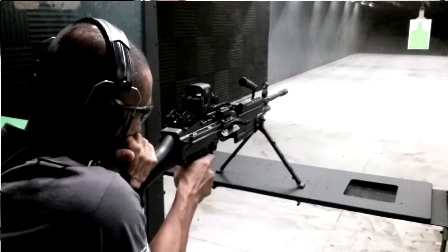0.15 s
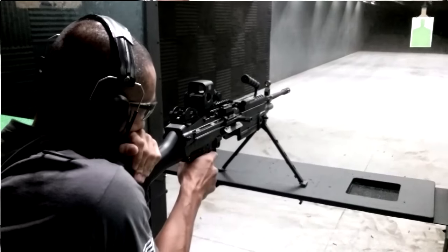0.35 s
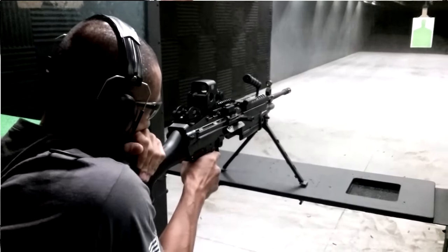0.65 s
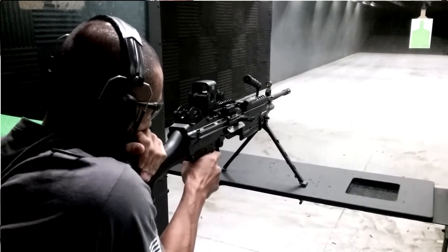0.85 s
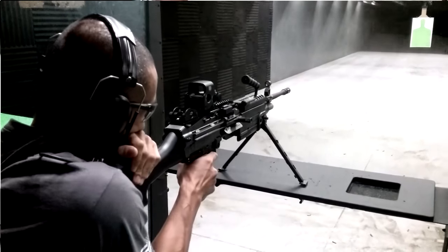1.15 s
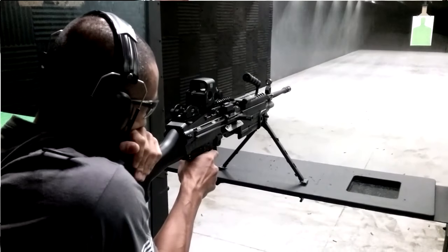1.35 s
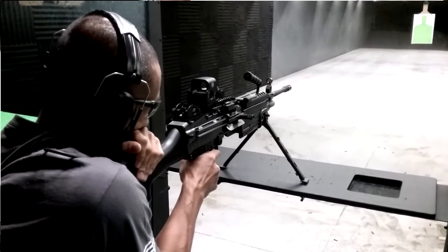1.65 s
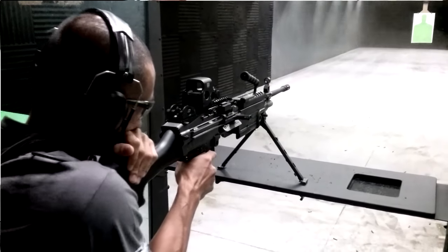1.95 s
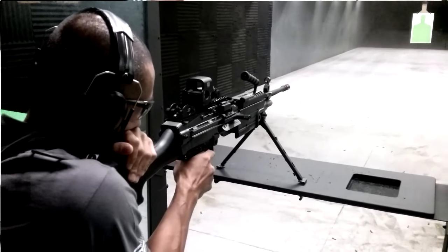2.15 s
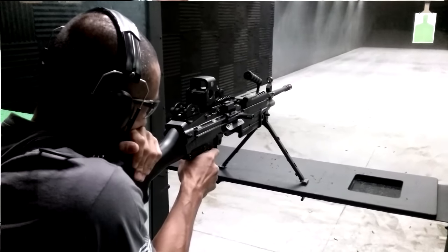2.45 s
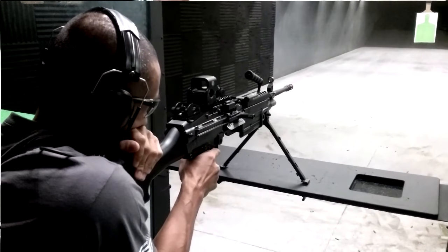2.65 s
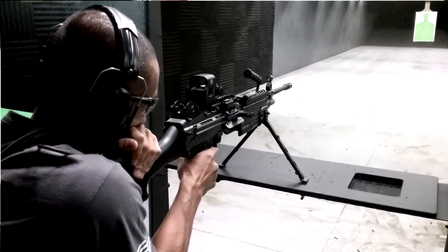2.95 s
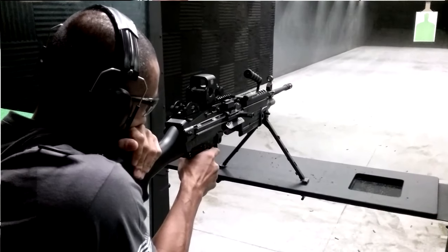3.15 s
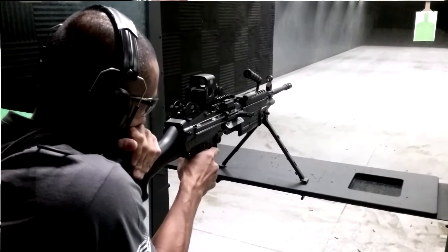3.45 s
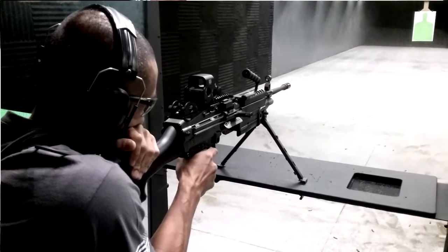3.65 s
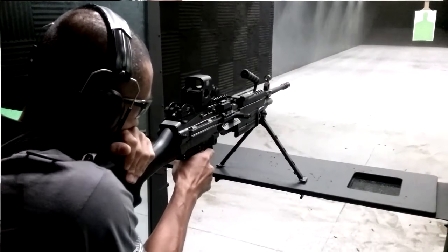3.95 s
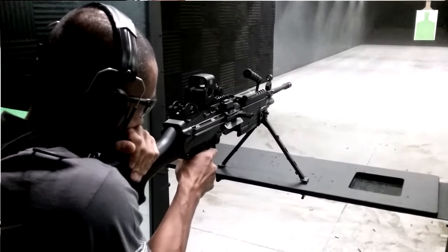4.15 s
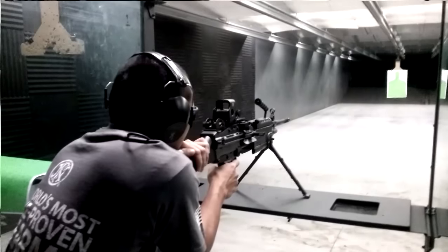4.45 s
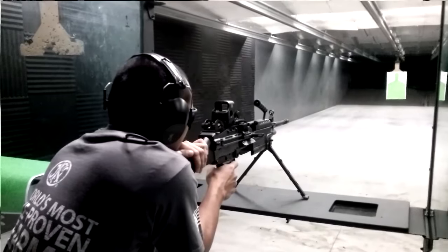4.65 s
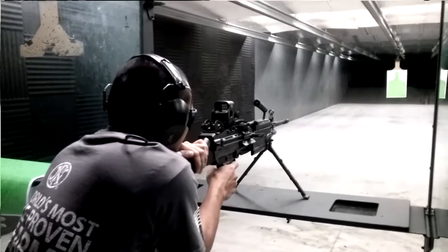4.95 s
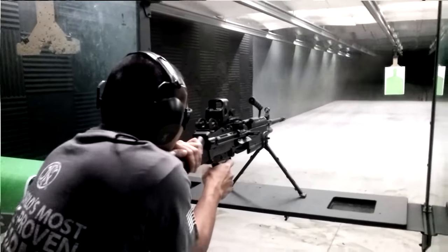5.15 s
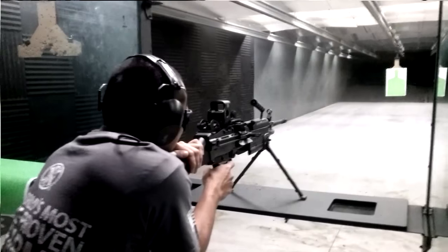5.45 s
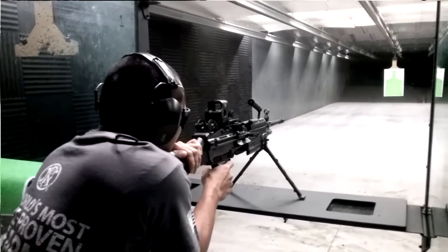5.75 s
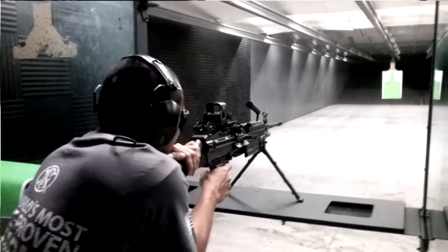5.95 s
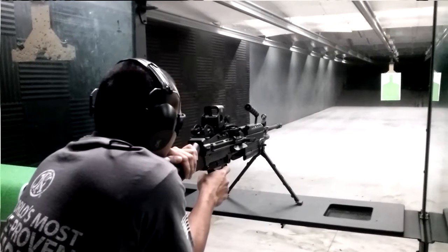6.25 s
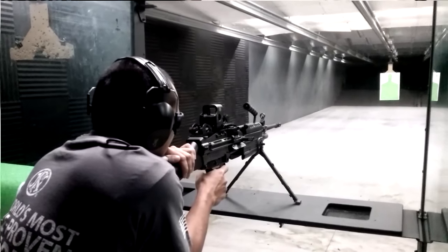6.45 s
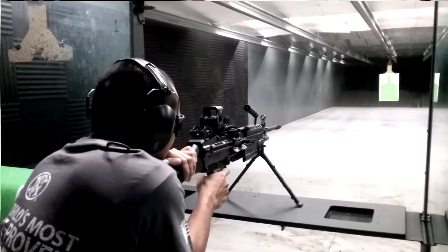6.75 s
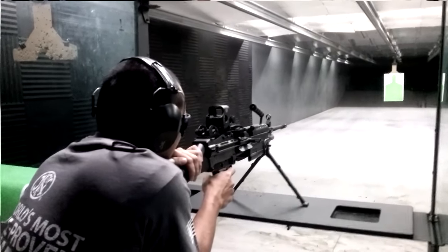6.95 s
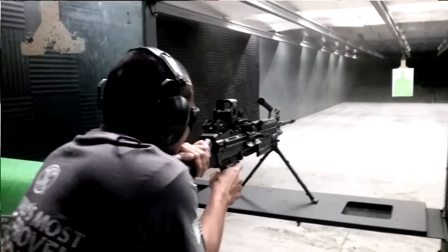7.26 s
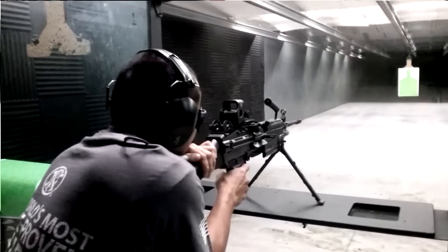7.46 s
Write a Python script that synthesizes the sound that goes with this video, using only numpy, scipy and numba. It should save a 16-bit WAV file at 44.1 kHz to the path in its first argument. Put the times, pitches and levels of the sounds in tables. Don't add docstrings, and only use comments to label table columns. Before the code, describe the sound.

Close hand-held stereo capture of a bipod-mounted machine gun fired shot by shot in a hard, echoing hall. Each steel bolt clack and sharp crack becomes a distorted boom with a dense decaying roar. Cases tick and ring between shots. Midway the view changes abruptly, background hum surges, then two further blasts duck it again.

```python
import sys
import numpy as np
from scipy import signal
from scipy.fft import rfft, irfft
from scipy.io import wavfile
from scipy.ndimage import uniform_filter1d
from numba import njit

SR = 44100
rng = np.random.default_rng(int(sys.argv[2]) if len(sys.argv) > 2 else 0)


def persist_wave(psi):
    counts = np.round(np.clip(psi, -1, 1) * 32767).astype(np.int16)
    wavfile.write(sys.argv[1], SR, np.atleast_2d(counts).T)


def amplitude_ratio(level_db):
    exponent = np.asarray(level_db, float) / 20
    return 10 ** exponent


N = 335601
T = np.arange(N) / SR
HZ = np.fft.rfftfreq(N, 1 / SR)
CUT_S, AFTER_S = 4.1955, 4.2005
LEFT_RIGHT = np.array([[1], [-1]])

# t/s, blast over the overload point/dB, stretch of the hall's decay [ratio],
# lead of the crack/s, crack level/dB
SHOTS = [
    (0.0569, 35, 0.75, 0.007, -9.5),
    (1.072, 35.5, 0.73, 0.0077, 0.5),
    (1.999, 33.5, 0.79, 0.0037, -15),
    (3.851, 32.5, 0.9, 0.0084, -0.5),
    (5.1858, 38, 0.65, 0.0072, -3),
    (7.165, 37.5, 0.66, 0.0088, -1.5),
]
# f/Hz, roar at the blast/dB per Hz, time to fall 60 dB/s,
# left minus right/dB, left-right likeness [-1 to 1]
HALL = [(40, -42, 1.8, -5, 0.9), (71, -19, 3.17, -0.5, 1), (154, -8.5, 1.64, -2.5, 0.99),
        (300, -8, 1.72, -2, 1), (840, -2.5, 1.637, -1.5, 0.38), (1400, 0.5, 1.43, -3.5, -0.15),
        (2000, -3.5, 1.44, -0.5, -0.19), (2556, -1.5, 1.486, -4, 0.057), (4150, -2, 1.447, -1.5, 0.032),
        (6310, -10, 1.06, -3.5, 0.038), (9000, -22, 0.43, -2.5, 0.29), (15140, -59, 0.69, -12.5, 0.13)]


def band(x, hz, width):
    edges = [hz - width / 2, hz + width / 2]
    return signal.sosfilt(signal.butter(2, edges, "band", fs=SR, output="sos"), x)


def unit(x):
    return x / np.sqrt(np.mean(x ** 2))


def at(hz, table, col):
    table = np.array(table)
    return np.interp(np.log(np.maximum(hz, 1)), np.log(table[:, 0]), table[:, col])


def fade(start, t60, rise):
    age = np.maximum(T - start, 0)
    alive = (T < CUT_S) == (start < CUT_S)
    return alive * (1 - np.exp(-age / rise)) * amplitude_ratio(-60 * age / t60)


def wander(seconds):
    size = int(seconds * SR)
    once = uniform_filter1d(rng.standard_normal(N), size)
    return unit(uniform_filter1d(once, size))


def diffuse(hz):
    wall_s, wall_share = .00995, 0.7
    wall_low_hz, wall_top_hz = 210, 900
    shape = np.exp(-(np.log((HZ + 1) / hz) / 0.2) ** 2)
    bounce = wall_share * np.exp(-2j * np.pi * HZ * wall_s)
    bounce = bounce / (1 + (HZ / wall_top_hz) ** 4) / (1 + (wall_low_hz / (HZ + 1)) ** 4)
    mid, side = irfft(unit(shape) * (1 + bounce) * rfft(rng.standard_normal((2, N))), N)
    like = np.clip(at(hz, HALL, 4), -1, 1)
    pair = np.sqrt(1 + like) * mid + np.sqrt(1 - like) * side * LEFT_RIGHT
    return pair * np.sqrt(hz) * amplitude_ratio(at(hz, HALL, 3) * LEFT_RIGHT / 2)


def hall():
    # f/Hz, level/dB per Hz
    fan_hum = [(30, -5), (60, 11.5), (150, 5), (230, -2.5), (400, -4), (900, -5.5), (1700, -4),
               (2400, -4.5), (3200, -5), (4500, -7.5), (6000, -22.5), (9000, -38), (16000, -48.5)]
    # f/Hz, level under the first roar/dB
    far_end = [(100, -36.5), (300, -33), (600, -30.5), (900, -22), (1400, -27), (1850, -34.5),
               (2500, -27.5), (3300, -39), (5000, -47.5), (7000, -59.5), (9000, -69)]
    fans_db, fans_patchy_share = -40.5, 0.27
    late_t60_s = 2.31
    patchy_size_db, patchy_s = 1.36, 0.034
    roar, fans = 0, 0
    late = sum(amplitude_ratio(db) * fade(s, late_t60_s, rise=.05) for s, db, *_ in SHOTS)
    for hz in 32 * 2 ** np.arange(0, 9.1, 1 / 3):
        t60 = at(hz, HALL, 2)
        swell = sum(amplitude_ratio(db) * fade(s, t60 * stretch, rise=0.011 + 8 / hz) for s, db, stretch, *_ in SHOTS)
        echoes = swell + late * amplitude_ratio(at(hz, far_end, 1))
        air = diffuse(hz)
        patchy_db = patchy_size_db * wander(patchy_s)
        roar = roar + amplitude_ratio(at(hz, HALL, 1) - 52.5) * echoes * air * amplitude_ratio(patchy_db)
        fans = fans + amplitude_ratio(at(hz, fan_hum, 1) + fans_patchy_share * patchy_db) * air[:, ::-1]
    return roar + amplitude_ratio(fans_db) * unit(fans)


def bolt():
    # t/s, level/dB
    runs = [
        (0.03, -16),
        (1.043, -18),
        (1.972, -18),
        (3.822, -19.5),
        (5.157, -20),
        (7.135, -18),
    ]
    spikes = amplitude_ratio(np.minimum(2 * rng.standard_exponential((2, N)), 9))
    grit = rng.standard_normal((2, N)) * spikes
    steel = unit(band(grit, 3300, 3500)) + amplitude_ratio(-11.5) * unit(band(grit, 8800, 11000))
    loudness = 0
    for s, db in runs:
        stop = np.clip((s + 0.023 - T) / 0.0069, .3, 1)
        loudness = loudness + amplitude_ratio(db) * fade(s, 0.14, rise=0.0083) * stop
    return steel * loudness


def blast():
    snap = unit(band(rng.standard_normal((2, N)), 3270, 4200))
    return snap * sum(amplitude_ratio(db - 8.0) * fade(s - lead, 0.073, rise=0.0018) for s, _, _, lead, db in SHOTS)


def bay():
    # f/Hz, level/dB, time to fall 60 dB/s
    modes = [(95, -36, 2.27), (292, -59, 3), (411, -59.5, 1.5), (574, -58.5, 3.4), (691, -58, 3.2),
             (785, -62, 3.1), (901, -57.5, 3.84), (1005, -68.5, 3.2)]
    lag_rad = 0.68
    node_db = 8
    out = 0
    for hz, mode_db, t60 in modes:
        sway = unit(band(rng.standard_normal(N), hz, 7))
        turn = 2 * np.pi * (hz * T + rng.random()) + lag_rad * LEFT_RIGHT / 2
        line = np.sin(turn) + .25 * sway
        place_db = mode_db - node_db * np.sqrt(100 / hz) * (T > CUT_S)
        swell = sum(amplitude_ratio(db) * fade(s, t60, rise=.1) for s, db, *_ in SHOTS)
        out = out + amplitude_ratio(place_db) * line * swell
    return out * amplitude_ratio(1.5 * LEFT_RIGHT)


def cases():
    # t/s, level/dB, low ring/dB, top ring/dB
    bounces = [
        (.779, -26, -23, -31),
        (.828, -53, -6, -20),
        (1.755, -43, -33, -9),
        (1.855, -42, -4, -5),
        (1.905, -38, -13, -14),
        (2.675, -48, -28, -14),
        (2.862, -48.5, -23, -18),
        (5.85, -45, -10, -18),
        (6.119, -47, -3, -8),
        (6.376, -42, -5, -12),
    ]
    tube_hz = [10775, 10860, 14950, 15080, 15590]
    tube_pitch = [.989, .995, .99, .997, 1.002, 1, 1, 1, 1.001, 1.002]
    ring_t60_s = 0.37
    out = np.zeros((2, N))
    chance = rng.random((len(bounces), 2, len(tube_hz), 1))
    tick = unit(band(rng.standard_normal((2, N)), 11500, 8000))
    for (s, db, low_db, top_db), ratio, turn in zip(bounces, tube_pitch, chance):
        ring = fade(s, ring_t60_s, rise=0.0021)
        out += amplitude_ratio(db - 15.0) * fade(s, 0.054, rise=.0005) * tick
        tone_db = (low_db - 3, low_db, 0, -6, top_db)
        for k, (hz, own_db) in enumerate(zip(tube_hz, tone_db)):
            out += amplitude_ratio(db + own_db) * ring * np.sin(2 * np.pi * (hz * ratio * T + turn[:, k]))
    blur = unit(band(rng.standard_normal((2, N)), 55, 80))
    return out * (1 + 0.336 * blur) * amplitude_ratio(-2.5 * LEFT_RIGHT)


def whistle():
    level_db, rise_db = -71.5, 2.5
    flutter_db, flutter_s = 2.5, .03
    span_s = (4.2, 5, 5.7)
    swell_db = np.interp(T, span_s, [-rise_db, 0, 1], left=-200, right=-200)
    gain = amplitude_ratio(level_db + swell_db + flutter_db * wander(flutter_s) - 5 * LEFT_RIGHT)
    return gain * unit(band(rng.standard_normal((2, N)), 11530, 130))


def rumble():
    mid, side = (unit(band(rng.standard_normal(N), 260, 340)) for _ in range(2))
    return amplitude_ratio(-47) * fade(AFTER_S, 4.8, rise=0.051) * (mid + 0.3 * side * LEFT_RIGHT)


def scene():
    return hall() + bolt() + blast() + bay() + cases() + whistle() + rumble()


def slow_gain():
    # start t/s, first shot t/s
    place_times = [(0, SHOTS[0][0]), (AFTER_S, SHOTS[4][0])]
    # open gain/dB, ducked gain/dB, open bass lift/dB, ducked bass lift/dB
    place_gains = [(5, -3.5, 7, -1.5), (8, -2.15, 7, -2)]
    # hold/s, one for each place
    bass_holds = [1.29, 0.36]
    duck_s = 0.022
    settle_db, settle_s = 11.5, 0.16
    dip_db, dip_back_s = 3.5, 0.28
    surge_db, surge_s = 4, 0.046
    gain_db, bass_db = np.zeros(N), np.zeros(N)
    for (start, shot), gains, hold in zip(place_times, place_gains, bass_holds):
        open_db, ducked_db, lift_db, thin_db = gains
        here = np.clip((T - start) / (AFTER_S - CUT_S) + 1, 0, 1)
        down = np.clip((T - shot) / duck_s + 1, 0, 1)
        worn = 1 - np.exp(-(np.maximum(T - shot, 0) / hold) ** 4)
        gain_db = gain_db + here * (open_db + down * (ducked_db - open_db) - gain_db)
        bass_db = bass_db + here * (lift_db + worn * (thin_db - lift_db) - bass_db)
    settle = settle_db * (T > AFTER_S) * np.exp(-np.maximum(T - AFTER_S, 0) / settle_s)
    dip = sum(fade(s, dip_back_s * np.log(1000), rise=0.0028) for s, *_ in SHOTS)
    return gain_db + settle, bass_db - (dip_db + surge_db * wander(surge_s)) * dip


def housing(x):
    # f/Hz, left/dB, right/dB
    colour = [(30, -0.5, -2), (200, -1.5, -3), (1070, 0, -1.5), (1690, 1.5, 0.5), (2370, -0.5, 2),
              (3170, -2.5, 0), (3890, -3, 2.5), (5000, 2.5, -3.5), (5560, -3.5, -2.5), (7500, -1, -1.5),
              (13400, 1.5, 3), (16000, 2, -5.5)]
    smear_s = .0005
    wind_cut_hz = 30
    cross_share, cross_s = 0.041, 0.000547
    padded = N + 4096
    hz = np.fft.rfftfreq(padded, 1 / SR)
    smear = np.exp(2j * np.pi * smear_s * hz * (np.log(1 + hz / 500) - 3))
    low_cut = (hz / (hz + 60)) ** 2 * hz ** 2 / (hz ** 2 + wind_cut_hz ** 2)
    x = rfft(x, padded) * amplitude_ratio([at(hz, colour, 1), at(hz, colour, 2)]) * low_cut * smear
    other = x[::-1] * np.exp(-2j * np.pi * hz * cross_s) * hz / (hz + 300)
    return irfft(x - cross_share * other, padded)[:, :N].copy()


@njit
def squeeze(x, top, power, attack, release, ahead):
    y, e = np.empty_like(x), top
    for i in range(x.shape[1]):
        j = min(i + ahead, x.shape[1] - 1)
        v = max(abs(x[0, j]), abs(x[1, j]))
        e += (v - e) * (attack if v > e else release)
        y[:, i] = x[:, i] * min(1., top / e) ** power
    return y


def band_limit(x):
    return signal.sosfilt(signal.butter(12, 16340, fs=SR, output="sos"), x)


def record(dry):
    x = np.clip(dry, -amplitude_ratio(1.0), amplitude_ratio(2.5))
    gain_db, bass_db = slow_gain()
    bass = signal.sosfiltfilt(signal.butter(1, 550, fs=SR, output="sos"), x)
    x = (x + (amplitude_ratio(bass_db) - 1) * bass) * amplitude_ratio(gain_db)
    x[1] += amplitude_ratio(-2) * (T > CUT_S) * band(x[1], 2180, 870)
    x = housing(x)
    attack, release = 1 / (0.0032 * SR), 1 / (.12 * SR)
    x = squeeze(x, amplitude_ratio(-11), 0.68, attack, release, 130)
    peak_db = 2.5
    x = amplitude_ratio(peak_db) * np.tanh(x * amplitude_ratio(3.5 - peak_db))
    x = signal.sosfilt(signal.ellip(12, .3, 80, 15820, fs=SR, output="sos"), x)
    mix = np.clip(x, -1, 1)
    return band_limit(mix)


dry = scene()
out = record(dry)
persist_wave(out)
```